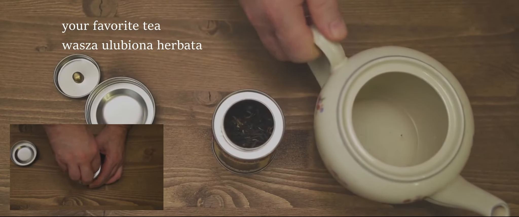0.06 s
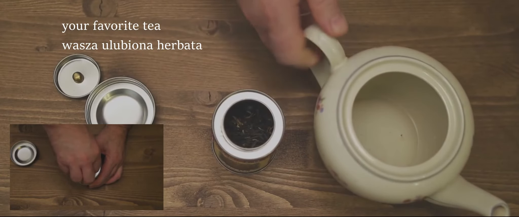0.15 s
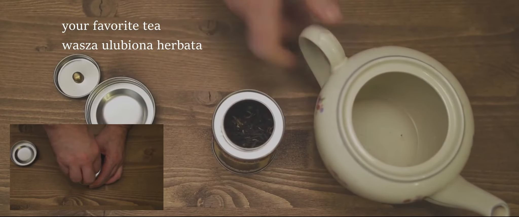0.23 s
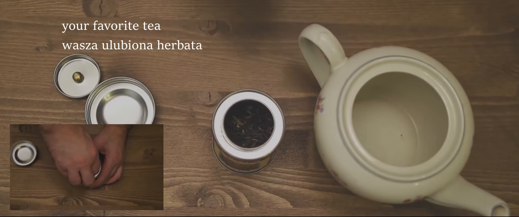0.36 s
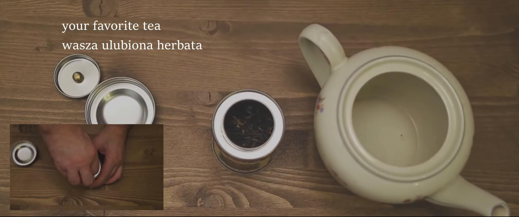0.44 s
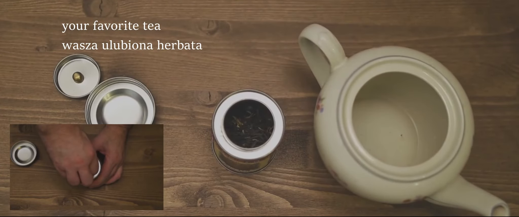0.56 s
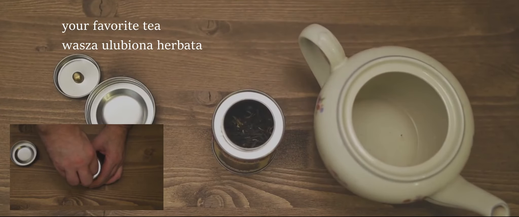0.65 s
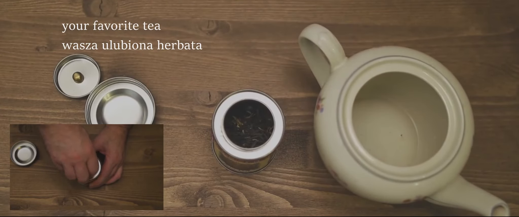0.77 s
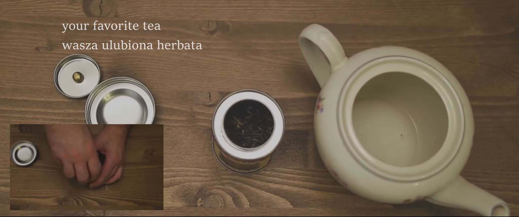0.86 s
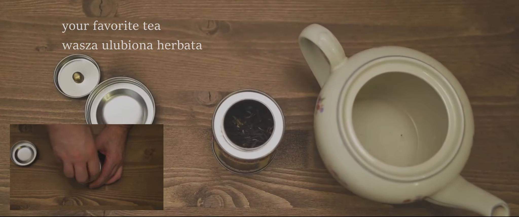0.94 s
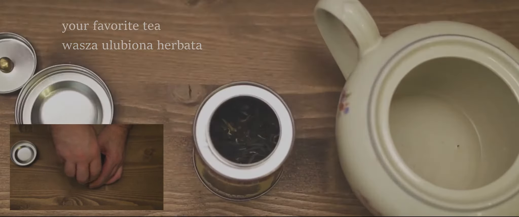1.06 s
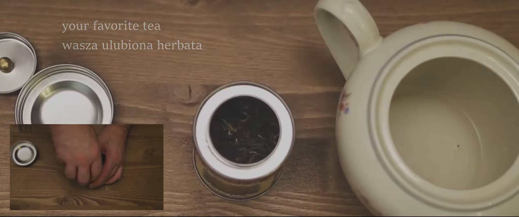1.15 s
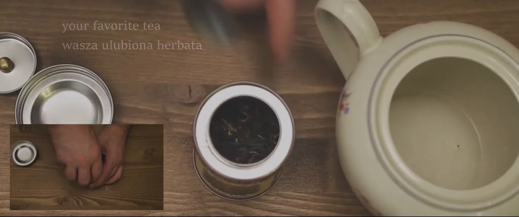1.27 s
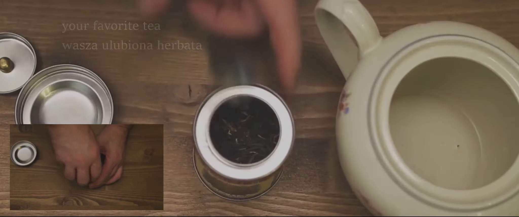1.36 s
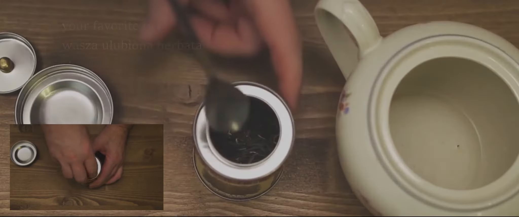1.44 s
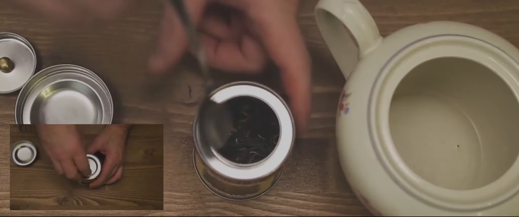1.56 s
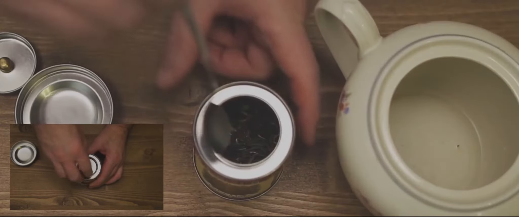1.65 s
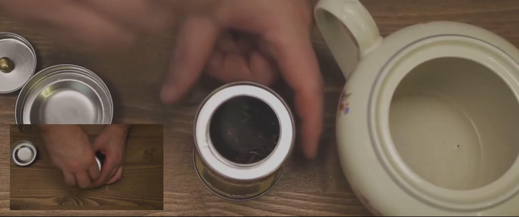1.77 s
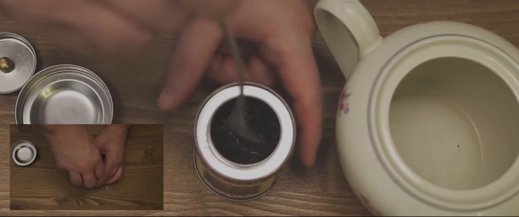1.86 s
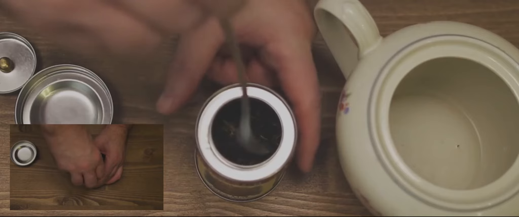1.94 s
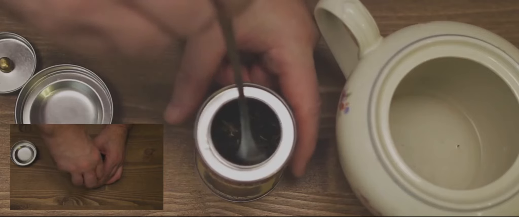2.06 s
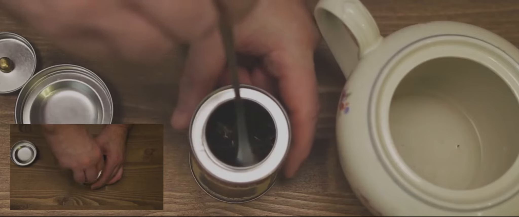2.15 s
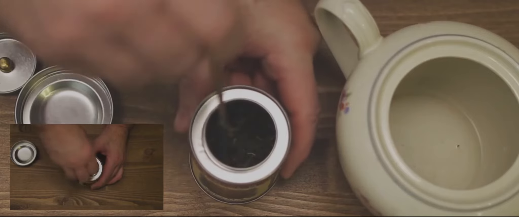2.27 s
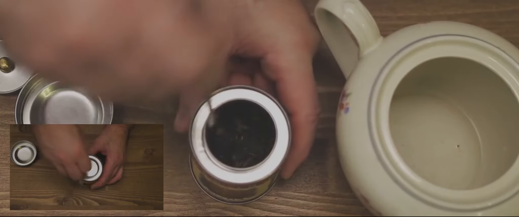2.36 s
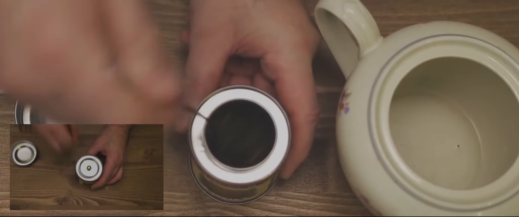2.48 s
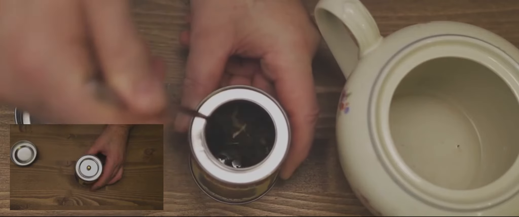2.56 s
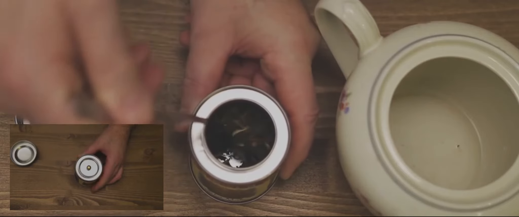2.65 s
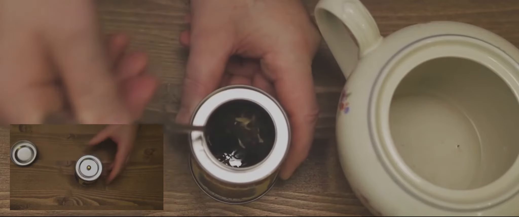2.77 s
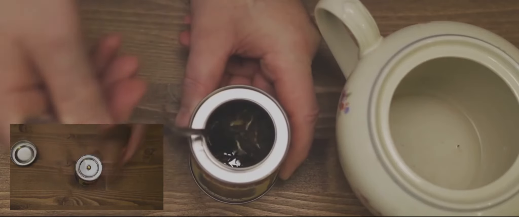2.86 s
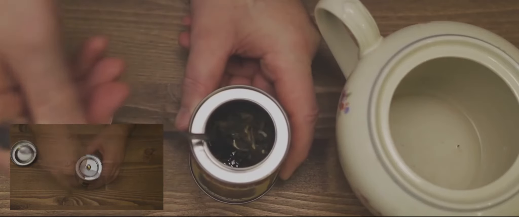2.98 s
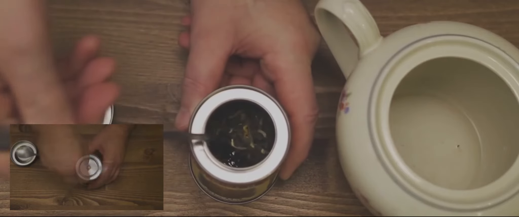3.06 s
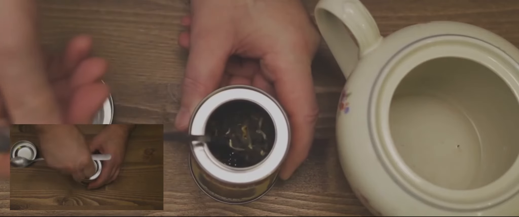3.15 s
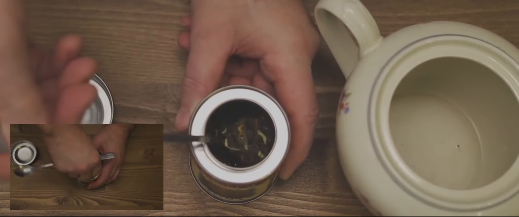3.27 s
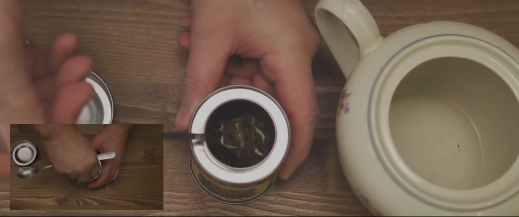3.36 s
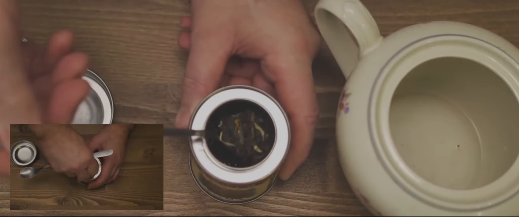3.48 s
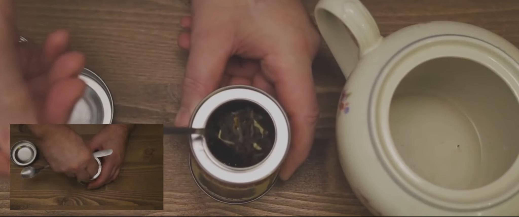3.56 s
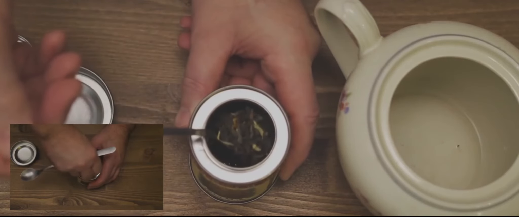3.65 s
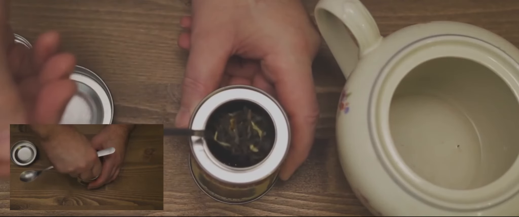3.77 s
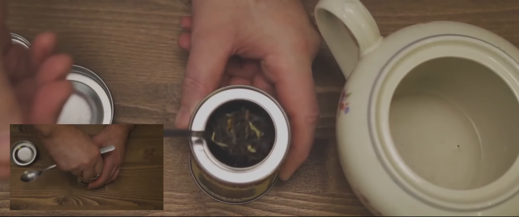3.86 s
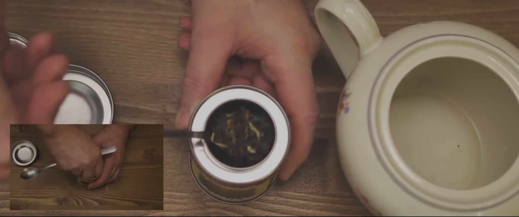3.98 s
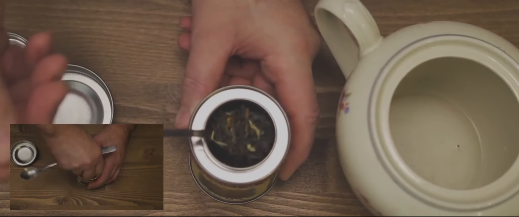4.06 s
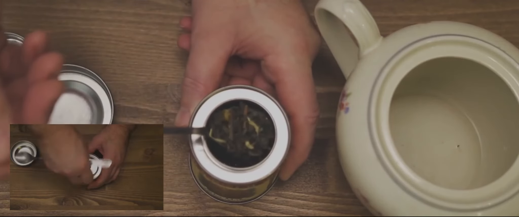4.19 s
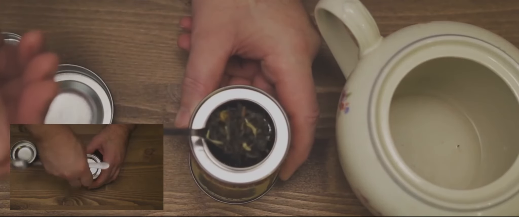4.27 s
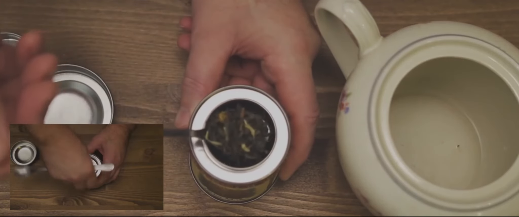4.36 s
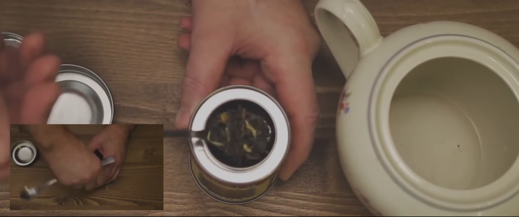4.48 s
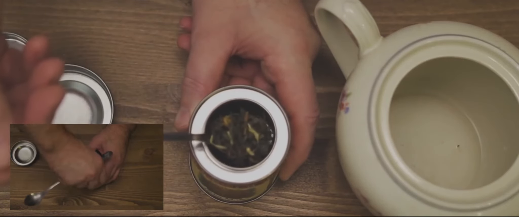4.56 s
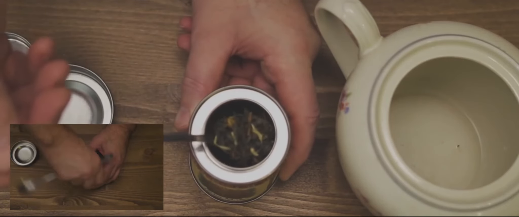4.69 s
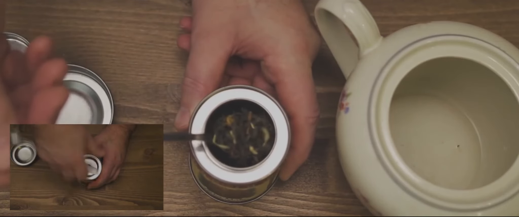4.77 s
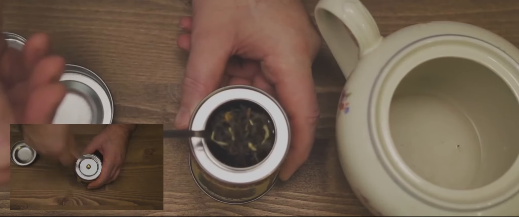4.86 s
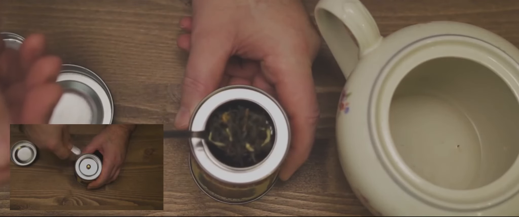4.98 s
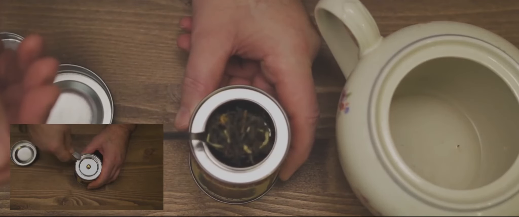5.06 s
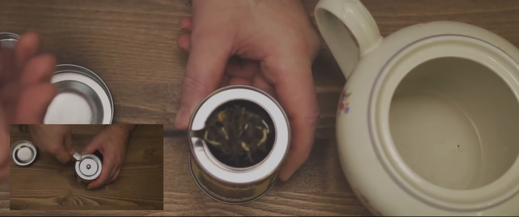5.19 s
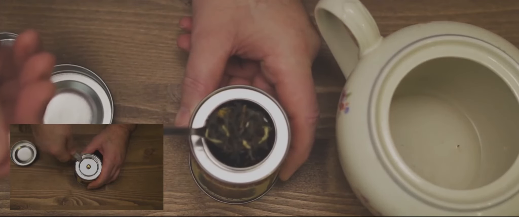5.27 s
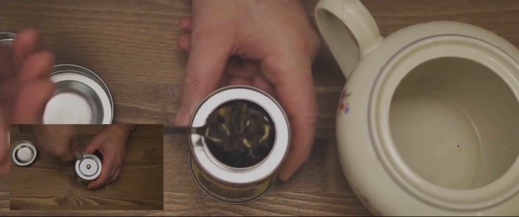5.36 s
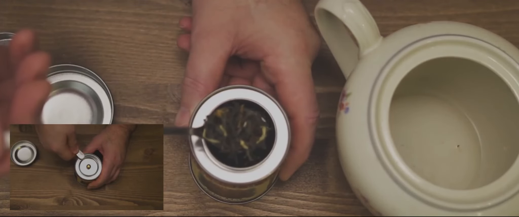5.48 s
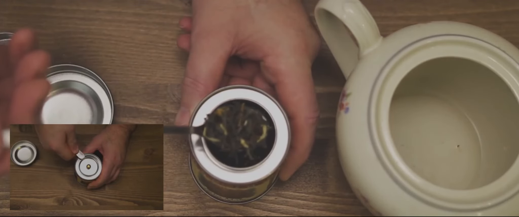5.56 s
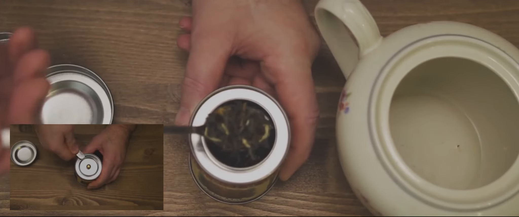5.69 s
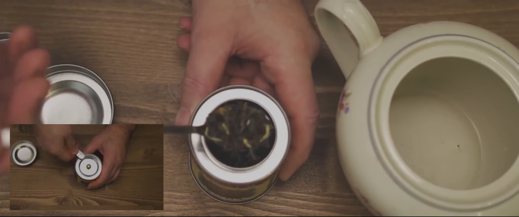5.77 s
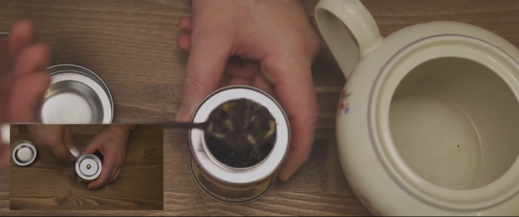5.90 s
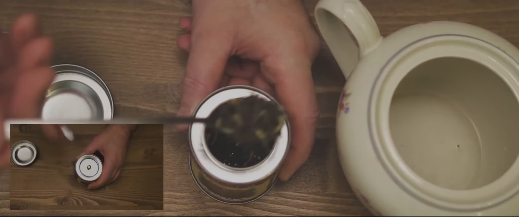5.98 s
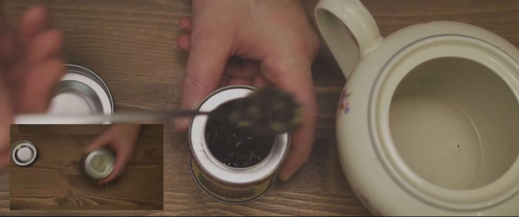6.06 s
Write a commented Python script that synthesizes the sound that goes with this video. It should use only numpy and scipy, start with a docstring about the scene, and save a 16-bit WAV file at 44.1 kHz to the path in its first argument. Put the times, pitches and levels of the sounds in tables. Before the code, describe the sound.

Close to the microphone in a small quiet room, a heavy porcelain teapot lands on a wooden table with a dull thump. A faint airy swell passes. Then a metal spoon rattles brightly on a tin's rim and digs into dry tea leaves with crunches, while the tin knocks hard on the wood. Leaves trickle off the rising spoon, followed by very faint metallic grazes over a soft low hum.

```python
"""A metal spoon clinks and rattles on a tin's rim, digs through dry tea leaves and knocks the tin on a
wooden table, then comes up slowly, shedding leaves and grazing the rim. Before that a porcelain teapot
is set down and a faint, smooth swell of airy noise passes. A small, quiet room with a faint hum.
Tin, spoon, table and teapot are decaying modes set off by blows; leaves and scrapes are showers of tiny
impulses through resonances and spectra; the airy swell, room air and hum are shaped noise."""
import sys
import numpy as np
from scipy import signal
from scipy.fft import rfft, irfft
from scipy.io import wavfile
from scipy.ndimage import uniform_filter1d

SR = 44100
rng = np.random.default_rng(int(sys.argv[2]) if len(sys.argv) > 2 else 0)


def inscribe(sig):
    """Save sig as 16-bit PCM at rate SR to the path in sys.argv[1].

    A 1-D sig is mono; a 2-D sig holds one channel per row.
    Samples are clipped to [-1, 1] before scaling.
    """
    pcm = np.round(np.clip(np.atleast_2d(sig).T, -1, 1) * 32767)
    wavfile.write(sys.argv[1], SR, pcm.astype(np.int16))


N = 270333
TIME = np.arange(N) / SR
RING = TIME[:SR // 2]  # time axis of one blow

# modes of the tin standing on the wooden top: pitch_hz, level_db, t60_s
TABLE_MODES = [(188, -13.5, 0.21), (242.3, -5.5, 0.13), (336.3, -8.5, 0.078), (410.5, -2, .11),
               (508, -7, .05), (618, 0, 0.031), (702.4, 0.5, .06), (772.6, -4, 0.049), (882, -0.5, 0.04),
               (1049, -6, 0.043), (1164, -7, 0.064), (1264, -5, 0.045), (1503, -4, 0.032),
               (1627, -19.5, 0.045)]
# modes of the tin's wall and rim: pitch_hz, level_db, t60_s
TIN_MODES = [(1780, -10.5, 0.092), (1912, 3, 0.14), (1988, -15.5, 0.092), (2152, -13.5, 0.45),
             (2312, -11, 0.092), (2824, -20, 0.16), (3470, -26.5, 0.14), (3902, -6, 0.19), (3964, -7.5, .1),
             (3985, -6, 0.14), (4100, -17.5, .12), (5240, -23.5, 0.18), (5770, -20, 0.2), (5820, -28, 0.29),
             (6916, -20, 0.17), (7093, -17, 0.088), (8505, -27, 0.15), (10580, -26.5, 0.13),
             (11300, -31.5, 0.18), (11300, -18, .08), (11140, -20, .13), (11360, -24.5, 0.13),
             (13100, -34.5, .16), (13100, -28.5, .13), (14355, -25.5, .17), (15760, -28, .12)]
# strokes of the spoon, first a rattle on the rim, then through the tea: start_s, length_s, crunch_db,
# crackle_db, crunch_pitch_factor, tin_judder_db, wall_scrape_db
STROKES = [(1.939, .12, -50, -51, 2.2, -25, -34.5), (2.166, .09, -35, -55, 1.2, -31.5, -52),
           (2.3, 0.15, -36.5, -40, 1.08, -35, -54), (2.424, 0.018, -32.5, -39, 1.08, -30, -41),
           (2.538, 0.035, -23.5, -26, 1.09, -23.5, -26.5), (2.591, 0.057, -33, -37, 0.98, -31.5, -44),
           (2.652, 0.063, -29, -43.5, 1.03, -28, -36.5), (2.726, 0.077, -31.5, -34, 0.99, -28, -29),
           (2.818, 0.042, -31, -33, 1.02, -27, -47), (2.924, 0.018, -36, -43, 0.97, -18.5, -32),
           (2.976, 0.079, -34.5, -41, 0.86, -26, -35.5)]
# leaves slide off the rising spoon: start_s, length_s, level_db
SPILLS = [(3.098, 0.18, -42.5), (3.193, 0.072, -42), (3.28, 0.15, -42.5), (3.461, 0.17, -44),
          (3.65, 0.078, -66), (3.859, 0.079, -55)]


def amp(db):
    """Decibels to gain."""
    return 10 ** (np.asarray(db) / 20)


def unit(x):
    """Scales to an rms of one."""
    return x / np.sqrt(np.mean(x ** 2) + 1e-20)


def struck(x):
    """Scales a blow so that its first hundredth of a second has an rms of one."""
    return x / np.sqrt(np.mean(x[:SR // 100] ** 2) + 1e-20)


def read(points, hz):
    """Reads a table of (Hz, value) on a log-frequency axis."""
    f, value = np.transpose(points)
    return np.interp(np.log(hz + 1), np.log(f + 1), value)


def add(mix, s, sound):
    """Mixes a sound in at a time in seconds."""
    part = mix[max(round(s * SR), 0):][:len(sound)]
    part += sound[:len(part)]


def colour(x, spectrum, size=2048):
    """Causal filter with the given spectrum, so clicks keep sharp fronts."""
    log_gain = np.log(amp(read(spectrum, abs(np.fft.fftfreq(size, 1 / SR)))))
    minimum_phase = np.exp(np.conj(signal.hilbert(log_gain)))
    taps = np.fft.ifft(minimum_phase).real
    return signal.oaconvolve(x, taps[:size // 2])[:len(x)]


def low_cut(x, hz):
    """Small bodies radiate almost nothing below their lowest mode."""
    return signal.sosfilt(signal.butter(3, hz, "high", fs=SR, output="sos"), x)


def ring(modes, weight=lambda hz: 1, length=1):
    """Decaying modes after one blow; neighbours swing in opposite directions."""
    out = 0
    for k, (hz, db, t60) in enumerate(modes):
        envelope = amp(db - 60 * RING / (t60 * length))
        out = out + (-1) ** k * weight(hz) * envelope * np.sin(2 * np.pi * hz * RING)
    return out


def burst(t60):
    """A brief chatter of micro-contacts that dies away."""
    return rng.standard_normal(len(RING)) * amp(-60 * RING / t60)


def slips(per_s, spread_db):
    """Random tiny impulses: many small, a few large."""
    size = amp(spread_db * np.minimum(rng.exponential(1, N), 4))
    return size * rng.choice([-1, 1], N) * (rng.random(N) < per_s / SR)


def wander(per_s):
    """Slow random drift with an rms of one."""
    hz = np.fft.rfftfreq(N // 64, 64 / SR)
    drift = irfft(rfft(rng.standard_normal(N // 64)) / (1 + (hz / per_s) ** 4))
    return unit(np.interp(TIME, np.linspace(0, TIME[-1], len(drift)), drift))


def grains(per_s, spread_db, cycles, clump_db):
    """Tiny pings of many pitches; each pitch comes in its own clumps, so the colour keeps shifting."""
    t, out = RING[:256], np.zeros(N)
    for hz in np.geomspace(1700, 15000, 16):
        ping = hz * np.exp(-t * hz / cycles) * np.sin(2 * np.pi * hz * t)
        clumps = slips(per_s, spread_db) * amp(clump_db * wander(per_s=45))
        out += signal.oaconvolve(clumps, ping)[:N]
    return unit(out)


def shimmer(t60, count=160):
    """Thin sheet metal has a crowd of weak partials between its main modes."""
    draws = rng.uniform([1500, .2, 0], [15500, 1, 2 * np.pi], (count, 3))
    hz, size, phase = draws.T[:, :, None]
    t = RING[:SR // 4]
    partials = size * (3000 / hz) ** 0.92 * np.sin(2 * np.pi * hz * t + phase)
    return np.sum(partials, axis=0) * amp(-60 * t / t60)


def swell(start, length, rise_s, sag_db_per_s, stop_db_per_s):
    """Gain over time of one movement: it rises, sags while it lasts, then dies away."""
    gain = np.zeros(N)
    fade_db = sag_db_per_s * RING + stop_db_per_s * np.maximum(RING - length, 0)
    add(gain, start, np.minimum(RING / rise_s, 1) * amp(-fade_db))
    return gain


def stroke_swell(start, length):
    """Gain of one spoon stroke: a quick rise and an abrupt stop."""
    return swell(start, length, rise_s=.012, sag_db_per_s=25, stop_db_per_s=300)


def spill_swell(start, length):
    """Gain of one slide of leaves: a softer rise and stop than a stroke."""
    return swell(start, length, rise_s=0.019, sag_db_per_s=33, stop_db_per_s=200)


def background():
    """Still room air and a narrow, wavering hum: noise shaped in the frequency domain."""
    # spectrum of the air: pitch_hz, level_db
    air_spectrum = [(15, -66), (25, -41.5), (87, -15), (166, -12), (195, 2), (223, -15), (285, -7.5),
                    (326, -10.5), (575, -16.5), (714, -20.5), (818, -21), (2220, -30), (4370, -29),
                    (5730, -34.5), (16000, -37.5)]
    # the hum's resonance: pitch_hz, width_hz, level_db
    hum_hz, width_hz, hum_db = (199, 12, -58)
    air_db = -52.5
    hz = np.fft.rfftfreq(N, 1 / SR)
    air, hum = rfft(rng.standard_normal((2, N)))
    air = air * amp(read(air_spectrum, hz))
    hum = hum / (1 + ((hz - hum_hz) / width_hz) ** 2)
    return amp(air_db) * unit(irfft(air, N)) + amp(hum_db) * unit(irfft(hum, N))


def room(x):
    """Dense reflections off table and walls; the treble dies first."""
    # reverberation time over frequency: pitch_hz, t60_s
    decay_times = [(150, 0.35), (400, 0.22), (1000, 0.25), (4000, 0.18), (14000, 0.12)]
    onset = np.clip((RING - .005) / 0.0064, 0, 1)
    taps = rng.standard_normal(len(RING)) * onset
    hz, t, z = signal.stft(taps, SR, nperseg=256)
    decay = amp(-60 * t / read(decay_times, hz)[:, None])
    tail = signal.istft(z * decay, SR, nperseg=256)[1]
    return signal.oaconvolve(x, tail / np.linalg.norm(tail))[:N]


def bumps():
    """Barely heard low thuds: two deep modes with a softened onset."""
    # soft, deep bumps: start_s, level_db
    bump_hits = [(3.27, -61), (4.139, -56.5), (5.04, -57), (5.549, -60)]
    # their modes: pitch_hz, level_db, t60_s
    bump_modes = [(57.5, -10, 0.28), (82.7, 5, 0.34)]
    out = np.zeros(N)
    for s, db in bump_hits:
        soft_onset = 1 - np.exp(-RING / 0.017)
        add(out, s, amp(db) * struck(ring(bump_modes)) * soft_onset)
    return out


def airy_swell():
    """A faint, smooth swell of airy noise: dense impulses through a spectrum, rising and fading."""
    # spectrum of the swell: pitch_hz, level_db
    swell_spectrum = [(150, -38.5), (250, -10.5), (440, 1), (488, -6), (589, -6), (1210, -7.5), (1390, -11),
                      (2610, -12), (4010, -8.5), (5190, -19.5), (15000, -32.5)]
    peak_s, width_s, peak_db = 1.417, 0.15, -46.5  # loudest here
    from_s, to_s = 0.91, 1.9
    bell = 1 / np.sqrt(1 + ((TIME - peak_s) / width_s) ** 2)
    gate = uniform_filter1d(1. * ((TIME > from_s) & (TIME < to_s)), size=1024)
    noise = unit(colour(slips(per_s=14000, spread_db=1.5), swell_spectrum))
    return amp(peak_db) * bell ** 1.23 * gate * noise


def teapot():
    """The heavy pot touches, rings faintly, then lands with a dull thump and settles."""
    # the teapot's foot meets the table (touch, landing, settling): start_s, level_db
    set_down = [(0.003, -35), (0.056, -5), (0.0655, -15)]
    # modes of the teapot on wood: pitch_hz, level_db, t60_s
    pot_modes = [(131.5, -26.5, 0.28), (192, -2.5, 0.075), (242.3, 3, 0.089), (340, -10, 0.05),
                 (374, -4, 0.073), (437.4, -5.5, 0.075), (535, -8.5, 0.035), (646, -5.5, 0.03),
                 (886, -14, 0.088), (1154, -24, 0.03), (2090, -46, 0.036), (3390, -41, 0.037)]
    # the porcelain's ring from first touch until it stands firm: pitch_hz, level_db, t60_s
    porcelain_modes = [(3430, -53.5, .3), (6830, -64, .4)]
    grit_spectrum = [(300, -5), (1200, 4), (3600, -3.5), (6000, -24), (15000, -24)]  # (Hz, dB)
    out = np.zeros(N)
    (touch_s, _), (landing_s, _), _ = set_down
    # RING starts at the touch, so the damping begins landing_s after it
    damping = np.exp(-np.maximum(RING - landing_s, 0) / .01)
    add(out, touch_s, ring(porcelain_modes) * damping)
    for s, db in set_down:
        grit = struck(colour(burst(t60=0.091), grit_spectrum))
        add(out, s, amp(db) * (struck(ring(pot_modes)) + amp(-34.5) * grit))
    return low_cut(out, hz=95)


def leaves():
    """Countless small fractures, each with a crunchy body and a bright edge, and single larger snaps."""
    # spectrum of the crunchy body: pitch_hz, level_db
    crunch_spectrum = [(1200, -14.5), (1480, -10.5), (1950, -12), (2400, -9.5), (2750, -2.5), (3150, 2),
                       (3450, -1), (3950, -2), (4300, -8.5), (5000, -13), (6000, -31)]
    # spectrum of the bright edge: pitch_hz, level_db
    crackle_spectrum = [(2000, -30.5), (4500, -4.5), (5700, -1.5), (6600, 4.5), (7900, 0), (8600, 1.5),
                        (9500, -3.5), (10800, 0.5), (11250, 6.5), (11800, -4), (12700, 0), (14300, -2.5),
                        (15700, -4.5)]
    # single leaves snap or drop: start_s, crunch_db, crackle_db
    snaps = [(2.679, -25, -48), (2.8572, -21.5, -23.5), (3.1704, -30.5, -43), (3.2843, -25.5, -33),
             (3.3216, -33.5, -52), (3.3894, -43, -33.5), (3.465, -50, -39.5), (3.515, -42, -40.5),
             (3.7099, -50, -57), (3.9481, -51, -43.5), (3.9627, -39.5, -53), (4.456, -58, -55.5),
             (4.5835, -61, -57), (5.2594, -60, -57), (5.2736, -56, -58)]
    out = np.zeros(N)
    fractures = grains(per_s=500, spread_db=4.0, cycles=4.1, clump_db=4.0)
    fractures += amp(-4) * unit(slips(per_s=1500, spread_db=2.5))
    crackle = unit(colour(fractures, crackle_spectrum))
    for start, length, crunch_db, crackle_db, pitch, *_ in STROKES:
        crunch = unit(colour(fractures, [(hz * pitch, db) for hz, db in crunch_spectrum]))
        out += stroke_swell(start, length) * (amp(crunch_db) * crunch + amp(crackle_db) * crackle)
    sliding = unit(colour(fractures, crunch_spectrum)) + amp(-1) * crackle
    for start, length, db in SPILLS:
        out += amp(db) * spill_swell(start, length) * sliding
    for s, crunch_db, crackle_db in snaps:
        snap = burst(t60=0.028)
        body = struck(colour(snap, crunch_spectrum))
        edge = struck(colour(snap, crackle_spectrum))
        add(out, s, amp(crunch_db) * body + amp(crackle_db) * edge)
    return low_cut(out, hz=60)


def scraping():
    """Stick and slip of the spoon drives the same table and tin modes; the pressing spoon damps the tin."""
    # the handle grazes the rim: start_s, length_s, level_db
    grazes = [(4.201, 0.041, -54), (4.302, 0.064, -64.5), (4.461, 0.044, -65), (4.595, 0.039, -68),
              (4.777, 0.031, -52), (4.849, 0.05, -52.5), (5.085, 0.031, -65), (5.248, 0.024, -64),
              (5.474, 0.024, -58)]
    # spectrum of the rim, damped by the rubbing handle: pitch_hz, level_db
    rim_spectrum = [(710, -52), (1200, -19), (1510, -24), (1930, -2), (2290, -6), (2570, -21), (3560, -18),
                    (3920, -5.5), (4950, -26), (5670, -13), (6110, -27), (11200, -21), (15000, -22)]
    out = np.zeros(N)
    dull_table = ring(TABLE_MODES, lambda hz: 1 / np.sqrt(1 + (hz / 800) ** 2))
    judder = signal.oaconvolve(slips(per_s=900, spread_db=2.5), dull_table)[:N]
    judder = unit(low_cut(judder, hz=162))
    friction = grains(per_s=330, spread_db=3.0, cycles=3.5, clump_db=4.0)
    damped_tin = ring(TIN_MODES, lambda hz: (hz / 2000) ** 0.34, length=0.18)
    wall = unit(signal.oaconvolve(friction, damped_tin)[:N])
    rim = unit(colour(friction, rim_spectrum))
    for start, length, *_, judder_db, wall_db in STROKES:
        out += stroke_swell(start, length) * (amp(judder_db) * judder + amp(wall_db) * wall)
    for start, length, db in SPILLS:
        out += amp(db - 5) * spill_swell(start, length) * judder  # the tin rumbles below the crunch
    for start, length, db in grazes:
        out += amp(db) * swell(start, length, rise_s=0.017, sag_db_per_s=30, stop_db_per_s=202) * rim
    return out


def knocks():
    """Blows pass through the tin into the table, each at a new spot; hard ones add a deep, short overload thump."""
    # the tin is knocked against the table: start_s, level_db, top_hz (hardness: highest pitch the blow reaches)
    knock_hits = [(1.9026, -6.5, 1244), (1.9126, -17.5, 800), (2.0, -14.5, 910), (2.132, -21.5, 935),
                  (2.178, -16.5, 446), (2.186, -20.5, 356.5), (2.201, -20.5, 300), (2.25, -23, 800),
                  (2.4695, -4, 1150), (2.483, -16.5, 1200), (2.541, -17.5, 1320), (2.555, -17.5, 1020),
                  (2.596, -23.5, 348), (2.777, -21, 453), (2.856, -25.5, 1500), (2.9225, -18, 1300),
                  (2.942, -19.5, 1410), (2.986, -19, 600), (3.045, -28, 297), (5.272, -51, 800)]
    thump_db, thump_s = -9.5, .002  # level beside a blow of 0 dB, time to the thump's peak
    wood, overload = np.zeros(N), np.zeros(N)
    thump = RING / thump_s * np.exp(-RING / thump_s)
    for s, db, top_hz in knock_hits:
        def weight(hz):
            """Random sign for the spot; the blow drives a band from 0.3 of its top pitch up to it."""
            return rng.choice([-1, 1]) / np.sqrt(1 + (hz / top_hz) ** 5.4 + (0.3 * top_hz / hz) ** 4)
        add(wood, s, amp(db) * struck(ring(TABLE_MODES, weight)))
        add(overload, s, amp(thump_db + 2 * db) * thump)  # grows with the square of the blow
    return low_cut(wood, hz=146.6) + overload


def clinks():
    """Metal on metal: a tick, the tin's ring, and the spoon singing until it is buried."""
    # the spoon strikes the tin: start_s, tin_db, tick_db, low_hz (lowest pitch the struck spot favours),
    # ring_length_factor
    clink_hits = [(1.9017, -18.5, -16.5, 4340, 0.56), (2.0, -17, -11.5, 1500, 2.1),
                  (2.0136, -14, -19.5, 1500, 0.53), (2.035, -19.5, -24, 1500, 0.73),
                  (2.1307, -7.5, -21.5, 1390, 0.29), (2.2515, -28, -32.5, 1290, 0.96),
                  (2.469, -19, -19.5, 1400, 0.13), (2.5384, -29, -42, 2410, 0.13),
                  (2.921, -40, -22, 2590, 0.16), (4.2307, -43, -58, 1491, 0.23),
                  (4.2907, -60.5, -56.5, 5000, .8), (4.3393, -54, -62.5, 2990, 0.53),
                  (4.6336, -52.5, -63, 3500, 0.46), (4.7344, -58, -66.5, 3000, 0.47),
                  (4.993, -57.5, -61, 3000, 0.62), (5.12, -54, -60, 2200, .5),
                  (5.1942, -64, -65.5, 2620, 0.39), (5.3568, -63, -58, 3490, 0.48),
                  (5.4231, -55, -61, 9000, 0.71), (5.476, -52, -43.5, 1910, 0.27),
                  (5.5138, -60, -51, 1880, .3)]
    # modes of the free spoon: pitch_hz, level_db, t60_s
    spoon_modes = [(2180, -14, 0.68), (2160, -7.5, .9), (2993, -1.5, 1)]
    # spectrum of the bare contact: pitch_hz, level_db
    tick_spectrum = [(300, -32), (1500, 2), (4000, -1), (6000, -6.5), (8500, -11.5), (11000, -6.5),
                     (15500, -4)]
    buried_s = 2.131  # from here on the leaves mute the spoon
    spoon_db = -14.5  # the spoon's ring against the contact tick
    tin, spoon = np.zeros(N), np.zeros(N)
    partials = amp(-20.5) * struck(shimmer(t60=0.29))
    for s, tin_db, tick_db, low_hz, length in clink_hits:
        tin_ring = ring(TIN_MODES, lambda hz: 1 / np.sqrt(1 + (low_hz / hz) ** 8), length)
        add(tin, s, amp(tin_db) * struck(tin_ring))
        add(tin, s, amp(tin_db) * length * partials)
        add(tin, s, amp(tick_db) * struck(colour(burst(t60=.028), tick_spectrum)))
        add(spoon, s, amp(tick_db + spoon_db) * struck(ring(spoon_modes)))
    muting = np.exp(-np.maximum(TIME - buried_s, 0) / .012)
    return tin, spoon * muting


def scene():
    """Everything on the table, close to one microphone, with the airy swell and the room around it."""
    pot, wood = teapot(), knocks()
    tin, spoon = clinks()
    rustle = scraping() + leaves()
    reflected = room(amp(-12.0) * pot + amp(-13) * wood + amp(-14.0) * tin + amp(-12) * rustle)
    close = pot + wood + tin + spoon + rustle
    return (close + reflected + airy_swell() + bumps() + background())[None]


def record(dry):
    """The hardest blows overload the input; then the band limit."""
    edge_hz = 15950
    clipped = np.clip(dry, -1, 1)
    low_pass = signal.firwin(401, edge_hz, window=("kaiser", 7), fs=SR)
    return signal.oaconvolve(clipped, low_pass[None], "same")


dry = scene()
out = record(dry)
inscribe(out)
```